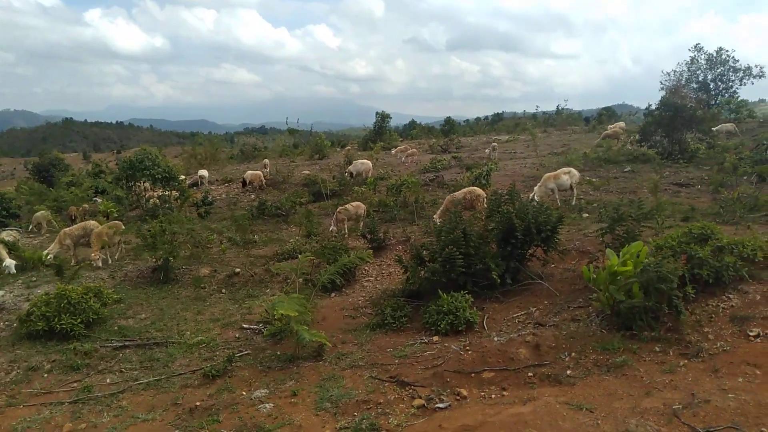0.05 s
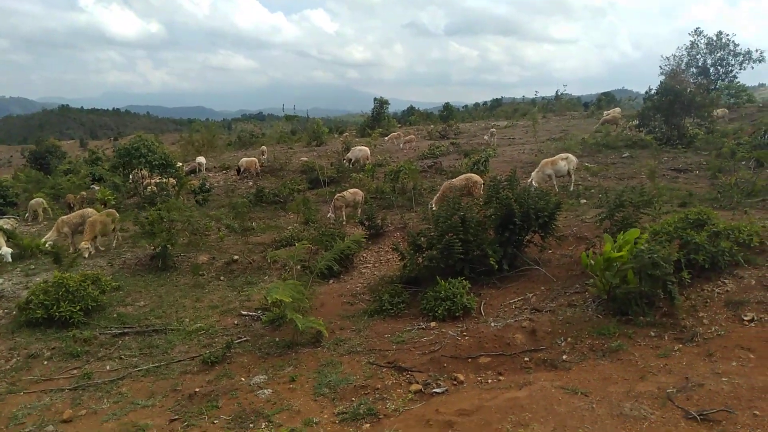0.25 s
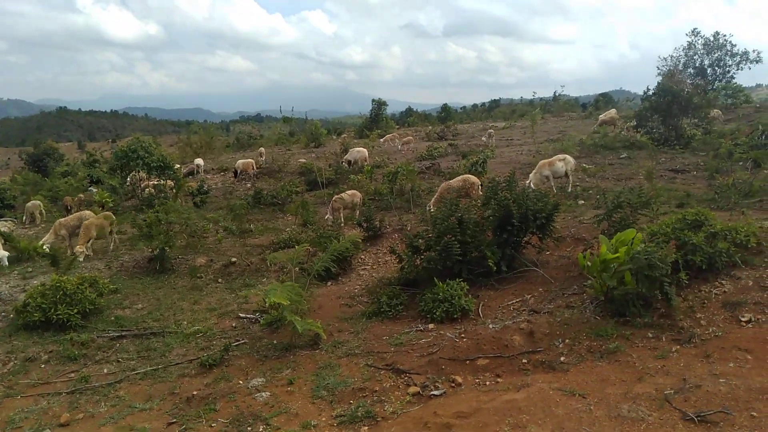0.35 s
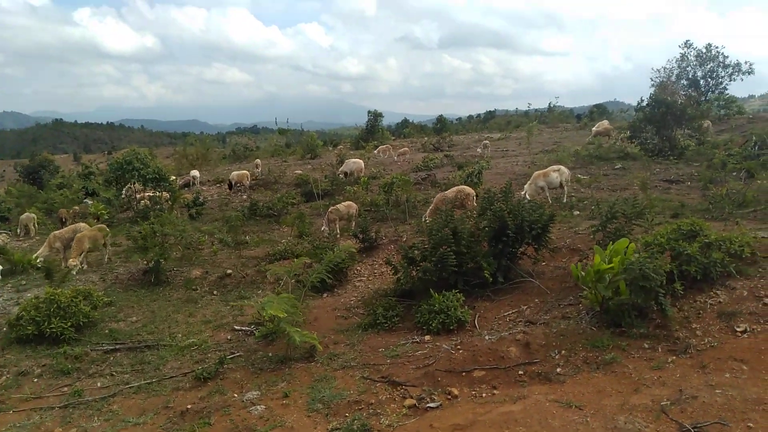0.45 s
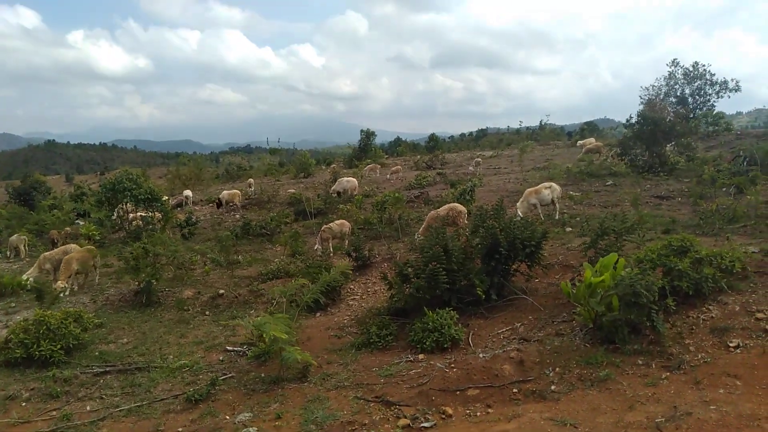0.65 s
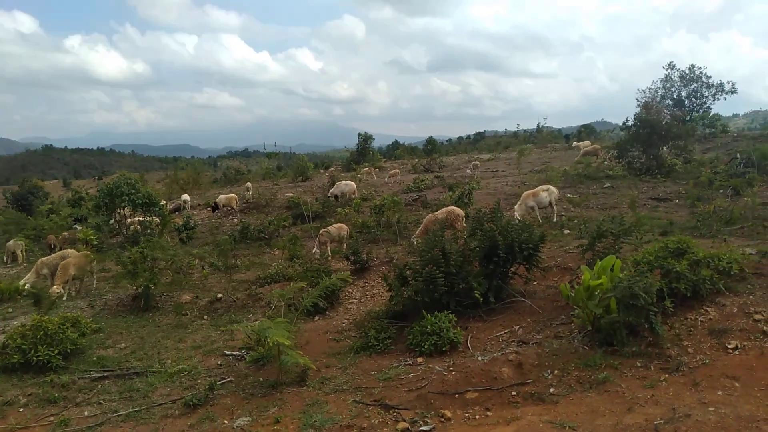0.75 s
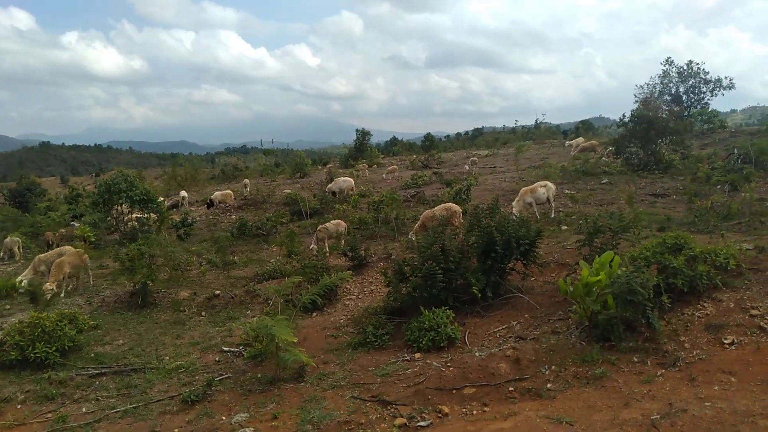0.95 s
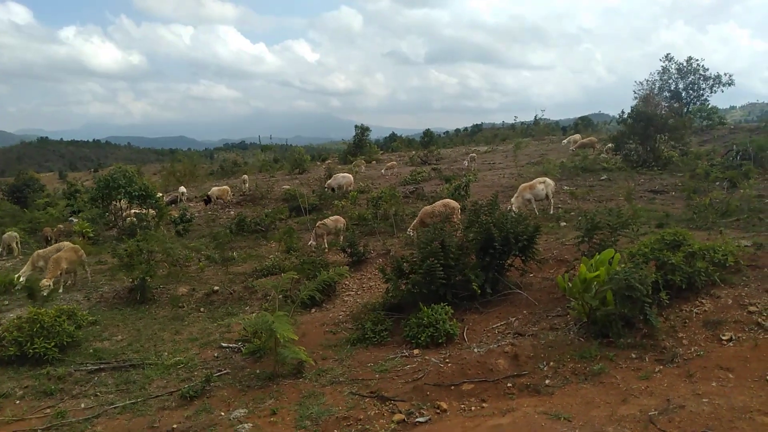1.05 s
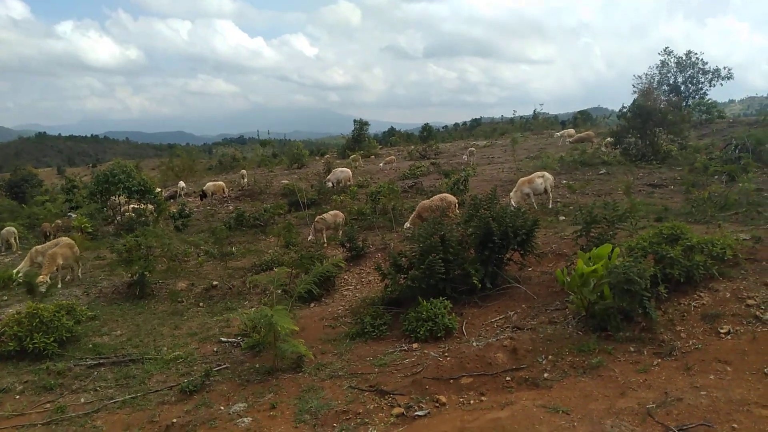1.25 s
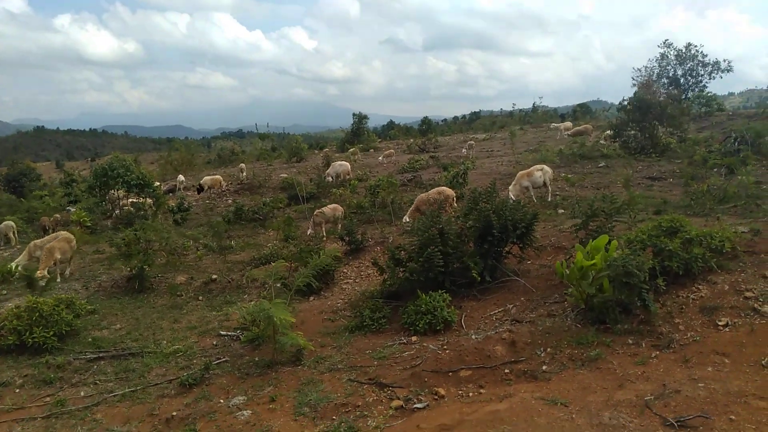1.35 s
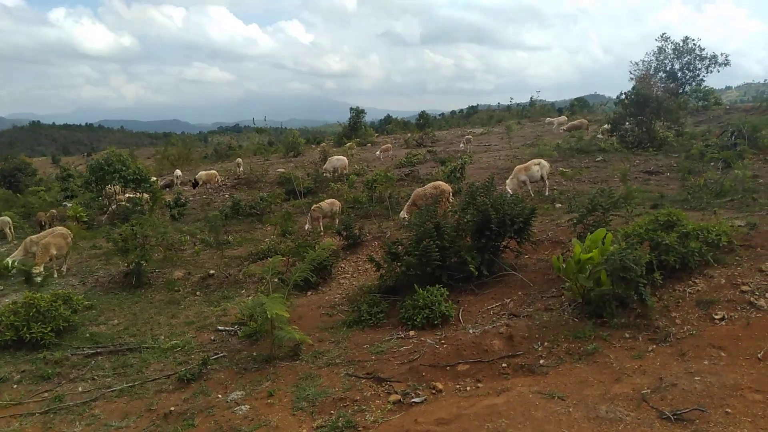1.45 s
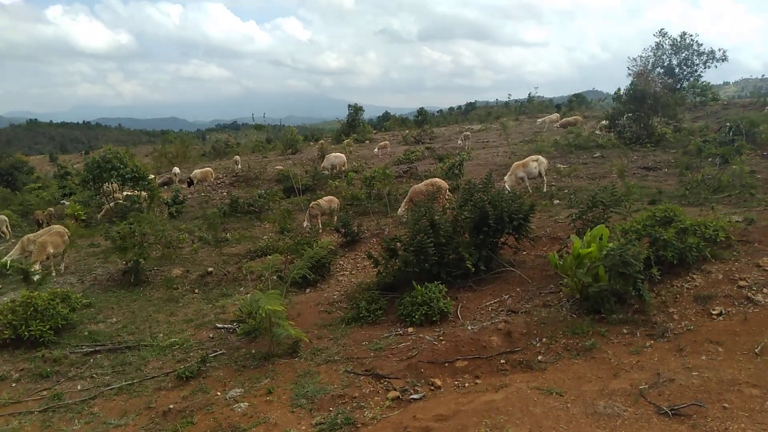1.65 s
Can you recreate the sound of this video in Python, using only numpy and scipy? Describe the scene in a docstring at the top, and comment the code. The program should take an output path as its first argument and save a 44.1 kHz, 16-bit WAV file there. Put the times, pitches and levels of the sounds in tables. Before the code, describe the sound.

A small bell rings lightly, then again more softly, over low wind buffeting outdoors.

```python
"""A small metal bell tings twice on a hillside pasture, its clapper striking firmly, then softly.
Just after the first ting something hard snaps and slips: a dry click with a tiny squeak.
Wind buffets the microphone with a low rumble, and one stronger gust early on stirs up eddies.
Faint ticks, brushes of dry grass and a far, low tone sit in a bed of open-air hiss."""
import sys
import numpy as np
from scipy import signal
from scipy.fft import rfft, irfft
from scipy.io import wavfile
from scipy.ndimage import uniform_filter1d

SR = 44100
rng = np.random.default_rng(int(sys.argv[2]) if len(sys.argv) > 2 else 0)


def transcribe(signal):
    """Save signal, clipped to [-1, 1], as a 16-bit WAV file at the path in sys.argv[1]."""
    frames = np.atleast_2d(signal).T
    limited = np.clip(frames, -1, 1)
    pcm = np.round(limited * 32767).astype(np.int16)
    wavfile.write(sys.argv[1], SR, pcm)


N = 74970

# clapper hits: t/s, level/dB, softness/0-1
BELL_STRIKES = [(0.5845, -49.5, 0.17), (1.25, -62.5, 1)]
# bell modes, close ones beating: f/Hz, hard-hit gain/dB, soft-hit gain/dB, t60/s
BELL_MODES = [(3036, -15, -12.5, .33), (7346, -4, -6, .3), (7351.3, -8.5, -8.5, .48), (7365, -12, -17, .29),
              (10869, -13, -5, .135), (11828, -12, -8.5, .085), (12665, -15.5, -9.5, .2)]
# colour of the click's crack: f/Hz, relative level/dB
CRACK_COLOUR = [(500, -1), (1300, 6.5), (2800, -2.5), (4300, 3.5), (5700, -15.5), (9000, -4), (15500, -4)]
# envelope of the wind's rumble: t/s, level/dB
WIND_ENVELOPE = [(0, -58.5), (.09, -66), (.21, -57.5), (.24, -42.5), (.285, -40), (.345, -49), (.38, -42),
                 (.495, -40.5), (.525, -54.5), (.70, -57.5), (.76, -63.5), (.83, -60.5), (.93, -72.5),
                 (1.02, -62.5), (1.2, -60.5), (1.29, -68.5), (1.36, -64.5), (1.44, -61.5), (1.53, -56),
                 (1.62, -61), (1.7, -65.5)]
# colour of the buffeting: f/Hz, relative level/dB
RUMBLE_COLOUR = [(8, -12.5), (20, 4.5), (38, -2), (58, -3), (100, -17.5), (170, -27), (260, -42.5),
                 (500, -59.5), (1500, -87)]
# colour of the small eddies: f/Hz, relative level/dB
EDDY_COLOUR = [(30, -13), (65, 1.5), (105, -0.5), (175, -13.5), (240, -23.5), (320, -39.5), (900, -82)]
# dry ticks and soft bumps: t/s, level/dB, centre f/Hz, decay/s
TICK_HITS = [(0.058, -62.5, 1050, 0.0029), (0.119, -54, 1650, 0.00039), (0.152, -57, 157, 0.0074),
             (0.192, -56, 197, 0.0035), (0.325, -58.5, 1420, 0.0013), (0.792, -63, 289, 0.006),
             (0.878, -68, 1750, .005), (0.901, -65, 860, 0.0024), (1.008, -65, 2300, .005),
             (1.189, -68, 14500, 0.022), (1.491, -63, 131, 0.011)]
# brushes of dry grass: peak t/s, level/dB, width/s
GRASS_BRUSHES = [(1.204, -69.5, 0.011), (1.329, -71, .006), (1.391, -73.5, 0.0067), (1.435, -74.5, 0.016),
                 (1.63, -72.5, 0.017)]
# colour of the grass: f/Hz, relative level/dB
GRASS_COLOUR = [(400, -6), (750, 0), (1200, 0.5), (2200, -9), (4000, -19), (10000, -22), (14000, -13),
                (15600, -15.5)]
# pitch and envelope of the far tone: t/s, f/Hz, level/dB
FAR_TONE_PATH = [(.55, 315, -93), (.64, 340.7, -80), (.77, 356, -80), (.82, 372, -83), (.89, 378, -83),
                 (1.0, 356, -90), (1.12, 345, -101), (1.25, 349, -77.5), (1.36, 335, -101)]
# colour of the open-air hiss: f/Hz, relative level/dB
AIR_COLOUR = [(100, 5.5), (300, -0.5), (700, 0.5), (1200, -2), (2000, -1.5), (3000, -6.5), (5200, -9.5),
              (6700, -5), (8200, -10.5), (11000, -10.5), (13500, -9.5), (15600, -4.5)]


def bell():
    """The clapper ticks on the wall and sets the modes ringing; a soft hit favours the main mode less."""
    out = np.zeros(N)
    for start, db, softness in BELL_STRIKES:
        age = since(start)
        body = sum(undb(np.interp(softness, [0, 1], [hard_db, soft_db])) * ring(age, hz, t60)
                   for hz, hard_db, soft_db, t60 in BELL_MODES)
        attack = 1 - np.exp(-age / 0.0008)
        contact = undb(-9.5) * burst(start, hz=6840, decay_s=0.0017, skirt_db=-20)
        out += undb(db) * (body * attack + contact)
    return out


def click():
    """Something hard snaps, cracks, knocks hollowly and slips with a very short squeak."""
    start_s, squeak_s, squeak_hz, pitch_rise = 0.6431, 0.0068, 1818, 0.015
    age = since(start_s)
    snap = undb(-51.5) * burst(start_s, hz=4320, decay_s=0.00062, skirt_db=-43)
    crack = undb(-52) * (age > 0) * np.exp(-age / 0.0036) * noise(CRACK_COLOUR)
    knock = undb(-61) * ring(age, hz=655, t60=0.051)
    # the squeak swells and fades over the slip, bending slightly sharp
    slip = np.minimum(age / squeak_s, 1)
    swell = np.abs(np.sin(np.pi * slip)) ** 0.62
    phase = 2 * np.pi * squeak_hz * age * (1 + pitch_rise * slip / 2)
    squeak = undb(-49.5) * swell * (np.sin(phase) + undb(-15) * np.sin(2 * phase))
    return snap + crack + knock + squeak


def wind():
    """Slow pressure swings rumble on the microphone; small eddies grow faster and fill out the gust."""
    gust_db, eddy_growth = -41, 1.36
    rumble_db = curve(WIND_ENVELOPE)
    eddy_db = -46.5 + eddy_growth * (rumble_db - gust_db)
    rumble = undb(rumble_db) * steady(noise(RUMBLE_COLOUR))
    eddies = undb(eddy_db) * steady(noise(EDDY_COLOUR))
    return rumble + eddies


def ticks():
    """Faint dry ticks and soft bumps close by, each a quick burst of noise."""
    return sum(undb(db) * burst(start, hz, decay_s, skirt_db=-34) for start, db, hz, decay_s in TICK_HITS)


def grass():
    """Dry grass brushes in brief swells of noise, made grainy by a fast flutter in level."""
    t = since(0)
    swell = sum(undb(db) * np.exp(-((t - peak) / width) ** 2 / 2) for peak, db, width in GRASS_BRUSHES)
    grain_db = 2.2 * noise([(20, -4), (200, -7), (800, -45), (5000, -90)])
    return swell * undb(grain_db) * noise(GRASS_COLOUR)


def far_tone():
    """A faint, unsteady low tone rises and sinks in the distance."""
    waver = 0.0075 * noise([(5, 3.5), (30, 1.5), (120, -40), (900, -90)])
    hz = curve(FAR_TONE_PATH) * (1 + waver)
    rms = undb(curve(FAR_TONE_PATH, column=2))
    return np.sqrt(2) * rms * np.sin(2 * np.pi * np.cumsum(hz) / SR)


def air():
    """The open air lays down a soft bed of hiss that wavers slightly in level."""
    waver_db = 0.5 * noise([(2, 16), (12, -26), (60, -54), (500, -91)])
    return undb(-68.5 + waver_db) * noise(AIR_COLOUR)


def ring(age, hz, t60):
    """One struck mode, dying by 60 dB in t60 seconds."""
    return np.sin(2 * np.pi * hz * age) * np.exp(-np.log(1000) * age / t60)


def burst(start, hz, decay_s, skirt_db):
    """A dying burst of noise around hz; skirt_db is its relative level 1.5 octaves to either side."""
    age = since(start)
    colour = [(hz / 8, 2 * skirt_db), (hz, 0), (hz * 8, 2 * skirt_db)]
    return (age > 0) * np.exp(-age / decay_s) * noise(colour)


def noise(colour):
    """Noise of rms 1, shaped by an EQ curve: f/Hz, relative level/dB."""
    hz, db = np.array(colour).T
    bin_hz = np.maximum(np.arange(N // 2 + 1) * SR / N, 1)
    eq = undb(np.interp(np.log(bin_hz), np.log(hz), db))
    shaped = irfft(rfft(rng.standard_normal(N)) * eq, N)
    return shaped / shaped.std()


def steady(sound, window_s=0.06):
    """Rides the gain to even out the slow chance swells of a noise."""
    size = int(window_s * SR)
    power = uniform_filter1d(uniform_filter1d(sound * sound, size), size)
    return sound / np.sqrt(power)


def curve(table, column=1):
    """An envelope: one column of a table joined by straight lines in time."""
    rows = np.array(table)
    return np.interp(since(0), rows[:, 0], rows[:, column])


def since(start):
    """Seconds since a moment, zero before it."""
    return np.maximum(np.arange(N) / SR - start, 0)


def undb(db):
    """Decibels to gain."""
    return 10 ** (np.asarray(db) / 20)


def scene():
    """The bell, the small close sounds and the pasture's ambience, mixed to mono."""
    return (bell() + click() + ticks() + grass() + wind() + far_tone() + air())[None]


def record(dry):
    """A steep low-pass trims the very top of the mix."""
    cutoff_hz = 15700
    return signal.sosfilt(signal.ellip(10, .2, 70, cutoff_hz, fs=SR, output="sos"), dry)


dry = scene()
out = record(dry)
transcribe(out)
```